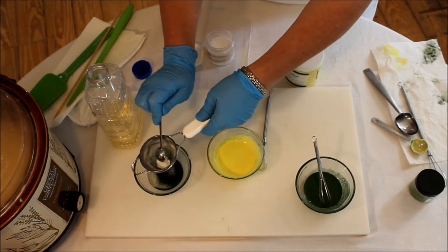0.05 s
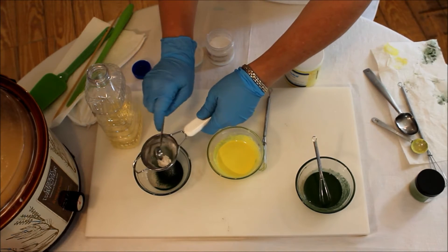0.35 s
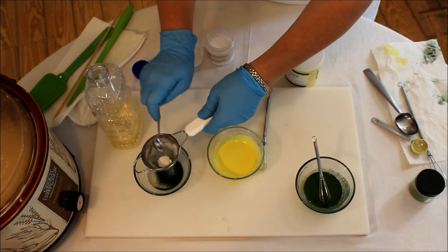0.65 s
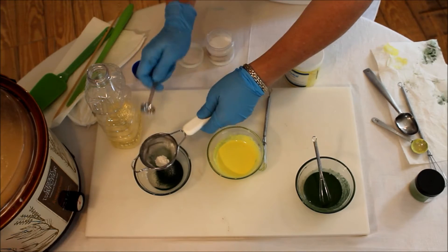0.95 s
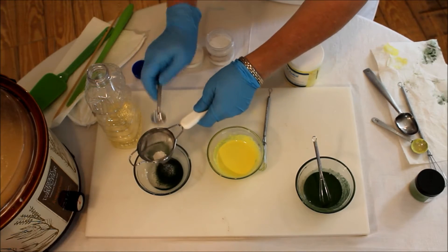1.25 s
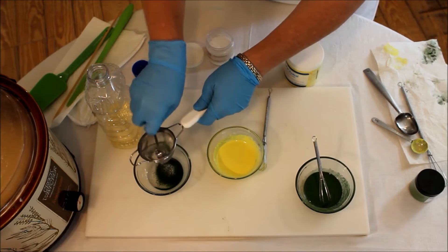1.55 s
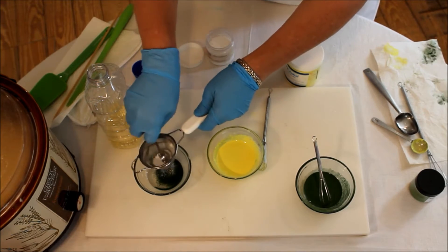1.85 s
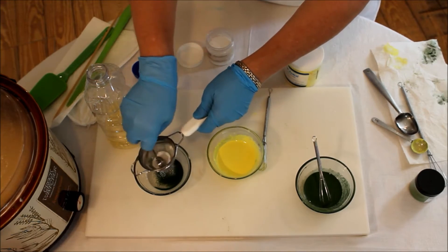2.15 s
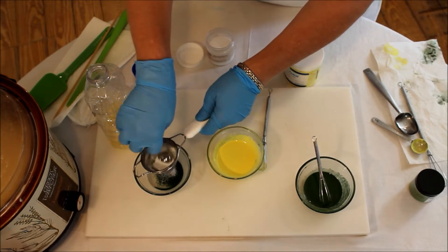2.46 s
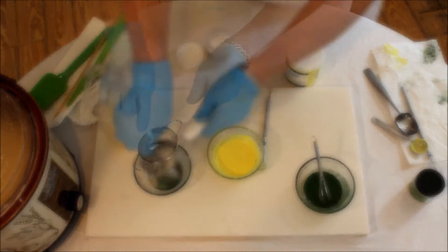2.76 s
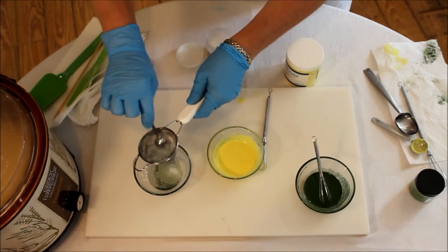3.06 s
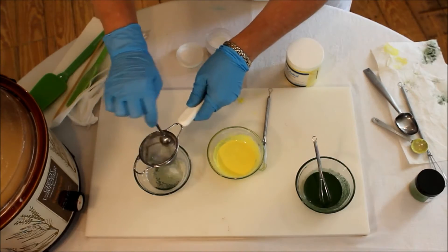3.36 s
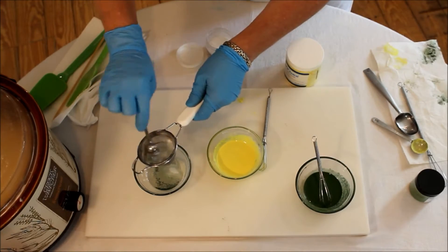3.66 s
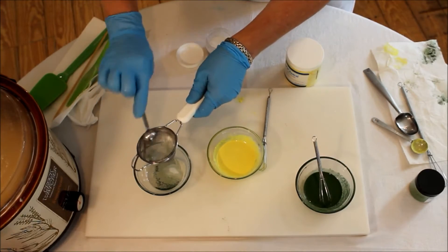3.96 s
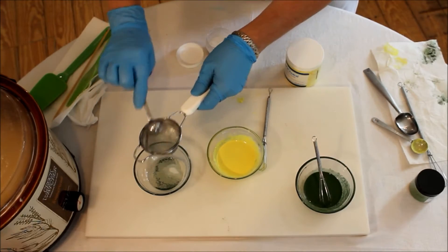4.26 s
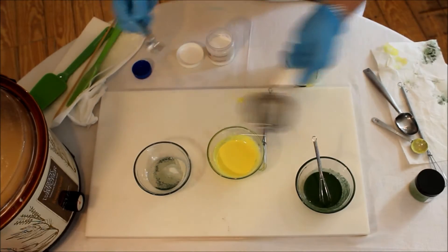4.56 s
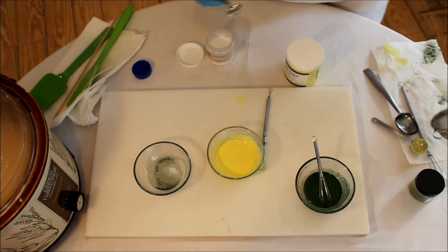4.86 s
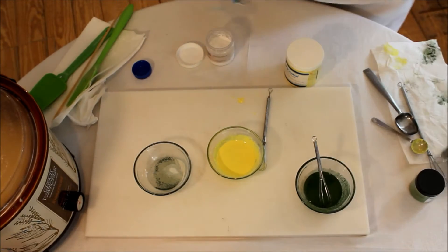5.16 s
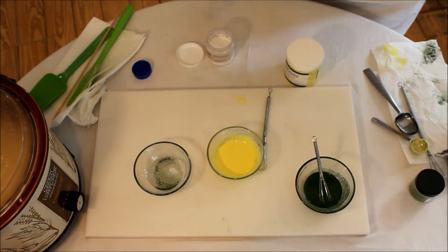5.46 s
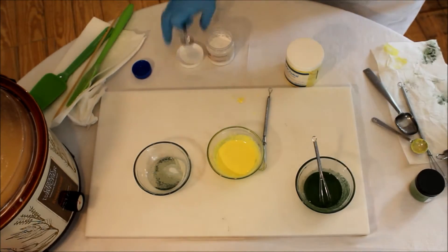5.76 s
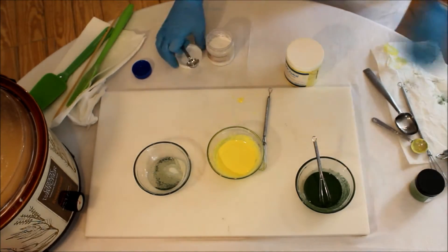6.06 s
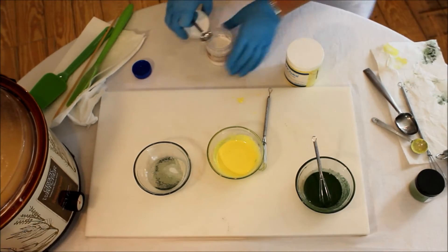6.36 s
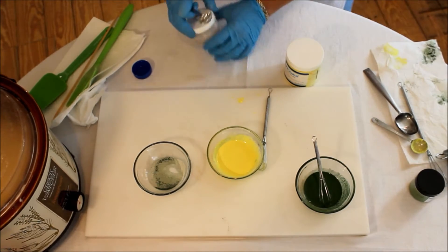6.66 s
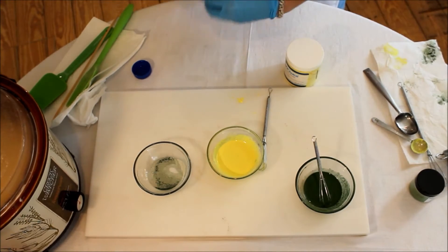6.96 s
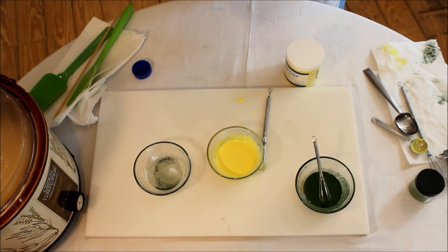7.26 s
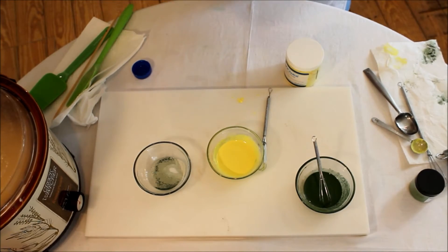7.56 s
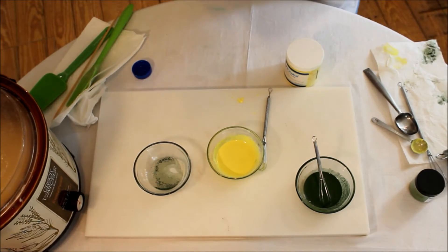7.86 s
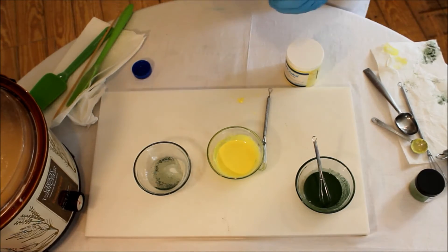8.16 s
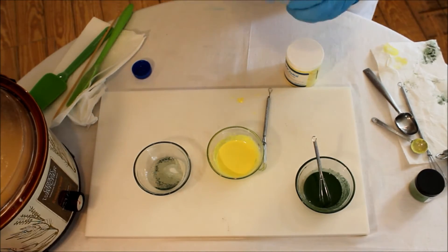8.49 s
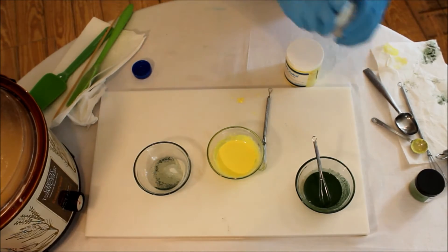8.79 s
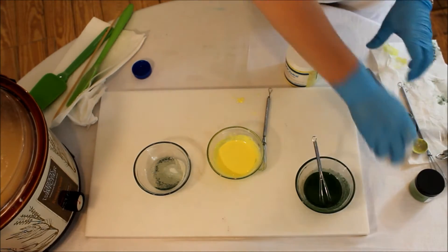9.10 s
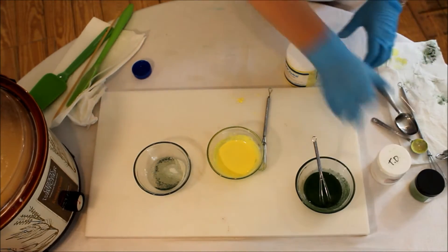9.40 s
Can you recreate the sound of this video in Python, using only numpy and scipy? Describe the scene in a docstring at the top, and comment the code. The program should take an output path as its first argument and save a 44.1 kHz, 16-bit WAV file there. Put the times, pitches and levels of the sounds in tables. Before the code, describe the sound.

Over a steady fan hum, a spoon rasps in a strainer and raps its rim, before dull thumps and small plastic knocks.

```python
"""In a small kitchen, a steel spoon works powder through a mesh strainer over a glass bowl, then raps
the rim four times. Stick-slip friction makes the mesh rasp and the spoon squeak; impacts ring their modes.
Sleeves rustle, things thud on the cloth-covered table, and a small plastic jar is handled and lidded.
An appliance fan hums throughout, and reverberation gives every knock a short tail."""
import sys
import numpy as np
from scipy import signal
from scipy.fft import rfft, irfft, next_fast_len
from scipy.io import wavfile
from scipy.ndimage import uniform_filter1d

SR = 44100
rng = np.random.default_rng(int(sys.argv[2]) if len(sys.argv) > 2 else 0)


def digitize_waveform(pressure):
    """Quantize a signal to 16-bit integers and store it at the path in sys.argv[1].

    Rows of a 2-D input are taken as channels; values are limited to [-1, 1].
    """
    field = np.atleast_2d(pressure).T
    bounded = np.clip(field, -1, 1)
    quanta = np.round(bounded * 32767).astype(np.int16)
    wavfile.write(sys.argv[1], SR, quanta)


N = 420343


def undb(db):
    """Decibels to amplitude ratio."""
    return 10 ** (np.asarray(db) / 20)


def unit(x):
    """Normalisation to rms 1."""
    return x / np.sqrt(np.mean(x ** 2))


def unit_hit(x, size=176):
    """Normalisation of an impact: its loudest four milliseconds have rms 1."""
    return x / np.sqrt(uniform_filter1d(x ** 2, size, mode="constant").max())


def add(track, s, sound):
    """Superposition: a sound joins the track at time s."""
    start = int(s * SR)
    track[start:start + len(sound)] += sound[:N - start]


def colour(x, points, resonances=()):
    """Minimum-phase filtering by (Hz, dB) points, lifted by (Hz, width, dB) resonances."""
    size = 2 * next_fast_len(len(x) // 2 + 1024)
    hz = np.maximum(np.arange(size // 2 + 1) * SR / size, 1)
    at_hz, db = np.transpose(points)
    db = np.interp(np.log(hz), np.log(at_hz), db)
    for centre, width, lift in resonances:
        db = db + lift / (1 + (2 * (hz - centre) / width) ** 2)
    cepstrum = irfft(db * np.log(10) / 20)
    cepstrum[1:size // 2] *= 2  # folding the cepstrum makes the filter causal
    cepstrum[size // 2 + 1:] = 0
    return irfft(rfft(x, size) * np.exp(rfft(cepstrum)))[:len(x)]


def resonate(x, hz, width):
    """Second-order resonance with gain 1 at its centre."""
    return signal.lfilter(*signal.iirpeak(hz, hz / width, fs=SR), x)


def walk(rate):
    """Smooth random modulation with rms 1."""
    hold = int(SR / rate)
    steps = np.repeat(rng.standard_normal(N // hold + 1), hold)
    return unit(uniform_filter1d(steps, hold)[:N])


def fade(t60):
    """Exponential decay, half a second long."""
    return np.exp(-np.log(1000) * np.arange(SR // 2) / SR / t60)


def swells(events):
    """Hann envelopes for (start, length, dB) strokes."""
    gain = np.zeros(N)
    for s, length, db in events:
        add(gain, s, undb(db) * np.hanning(int(length * SR)))
    return gain


def slides(events, attack_s, t60):
    """Attack, hold and exponential release envelopes for (start, hold, dB) slides."""
    gain = np.zeros(N)
    attack = np.linspace(0, 1, int(attack_s * SR))
    for s, hold, db in events:
        add(gain, s, undb(db) * np.concatenate([attack, np.ones(int(hold * SR)), fade(t60)]))
    return gain


def favour(modes, centre_hz, width_hz, lift_db):
    """Selective excitation: the place of contact lifts the modes near one frequency."""
    return [(hz, db + lift_db / (1 + (2 * (hz - centre_hz) / width_hz) ** 2), t60)
            for hz, db, t60 in modes]


def ring(modes, scatter_db, detune=0):
    """Free vibration of damped modes: the contact point reweights them, the grip shifts their pitch."""
    t = np.arange(SR // 2) / SR
    out = 0
    for hz, db, t60 in modes:
        side, weight, grip = rng.standard_normal(3)
        amplitude = np.sign(side) * undb(db + scatter_db * weight)
        out = out + amplitude * fade(t60) * np.sin(2 * np.pi * hz * (1 + detune * grip) * t)
    return unit_hit(out)


def crack(points, t60, rise_s=0.00054):
    """Impact transient: dense vibration builds up during contact and is quickly damped."""
    push = np.minimum(np.arange(SR // 2) / SR / rise_s, 1)
    return unit_hit(colour(rng.standard_normal(SR // 2) * push * fade(t60), points))


def slips(rate, spread_db):
    """Stick-slip friction as a Poisson train of tiny impulses of uneven size."""
    sizes = undb(spread_db * np.minimum(rng.exponential(size=N), 4))
    slipping = rng.random(N) < rate / SR
    return unit(slipping * sizes * rng.standard_normal(N))


# spectrum of the airflow: (frequency [Hz], gain [dB])
AIR_SPECTRUM = [(25, -36), (60, -22), (95, -18), (125, -0.5), (200, -8.5), (250, -2.5), (420, 3.5),
                (620, -2.5), (1200, -6.5), (2000, -13.5), (4000, -22.5), (7000, -31), (11000, -36),
                (16000, -36.5)]
# resonances of the fan housing: (frequency [Hz], bandwidth [Hz], lift [dB])
HOUSING_RESONANCES = [(173.4, 6.1, 18.2), (233, 43, 7.3), (279, 39, 11.9), (493.8, 19.4, 9.3),
                      (813, 16, 4.8)]
# motor and blade tones: (frequency [Hz], rms level [dB])
FAN_TONES = [(119.8, -63.5), (159.9, -58)]


def fan(air_db=-45.5):
    """Turbulent flow excites a resonant housing over two low tones that waver slightly in phase."""
    t = np.arange(N) / SR
    air = unit(colour(rng.standard_normal(N), AIR_SPECTRUM, HOUSING_RESONANCES))
    air *= undb(air_db + 0.33 * walk(1.43))
    hum = sum(np.sqrt(2) * undb(db) * np.sin(2 * np.pi * hz * t + 0.27 * walk(1.59))
              for hz, db in FAN_TONES)
    return air + hum


# spectra of the snapping mesh and the spoon's tick: (frequency [Hz], gain [dB])
MESH_SPECTRUM = [(50, -39), (200, -10), (700, 10.5), (1400, 7), (2150, 8), (2900, 7), (3400, 5), (5000, -4),
                 (6500, -14), (9000, -30), (16000, -45)]
TICK_SPECTRUM = [(200, -36), (1200, -7), (3000, 10), (4300, 5), (5300, 5), (6800, 5), (10000, -0.5),
                 (13500, -15), (16000, -5)]
# modes of the spoon: (frequency [Hz], relative level [dB], T60 [s])
SPOON_MODES = [(2960, 4, .026), (3240, 3, .016), (3800, -2, .025), (5280, 1, .025), (6780, 2, 0.035),
               (6980, 0, .025), (7910, 4, 0.07), (8040, -1, .05), (12600, -2, 0.03), (13400, -1, .03),
               (14100, -2, 0.03)]
# the spoon catches in the mesh and skids on:
# (time [s], mesh level [dB], mesh resonance [Hz], relative spoon level [dB], relative skid level [dB])
CATCHES = [(0.0635, -48, 2100, -35, -74), (0.188, -46, 1890, -34.5, -65), (2.833, -35, 2950, -45, -62),
           (2.858, -53, 2300, -56, -57), (2.979, -45, 2300, -58, -41.5), (3.037, -29, 2190, -53, -38.5),
           (3.2144, -29.5, 2400, -55, -38.5), (3.3068, -40.5, 1490, -71, -37), (3.32, -39, 1700, -71, -55),
           (3.373, -47, 1600, -58, -64), (3.402, -30.5, 2470, -58, -45), (3.437, -36, 1500, -51, -44),
           (3.7917, -44, 1870, -64, -50)]


def catches():
    """Sudden release: the spoon snaps off the wires, exciting a local mesh resonance and its own modes."""
    out = np.zeros(N)
    for s, mesh_db, mesh_hz, spoon_db, _ in CATCHES:
        snap = undb(-1) * crack(MESH_SPECTRUM, t60=0.014, rise_s=0.00035)
        buzz = undb(-11) * crack(MESH_SPECTRUM, t60=0.048)
        release = snap + buzz
        mesh = unit_hit(release + undb(3) * resonate(release, mesh_hz, width=950))
        tick = undb(-4) * crack(TICK_SPECTRUM, t60=0.054)
        rattle = undb(-15) * crack(TICK_SPECTRUM, t60=0.26)
        ping = undb(-4) * ring(SPOON_MODES, scatter_db=0.52)
        add(out, s, undb(mesh_db) * mesh + undb(spoon_db) * (ping + tick + rattle))
    return out


# spectrum of the coarse rasp: (frequency [Hz], gain [dB])
SKID_SPECTRUM = [(400, -5), (900, 23), (1500, 22), (2200, 14.5), (2900, 6), (3800, 7), (6000, -26),
                 (16000, -27)]


def skids(wire_slips, gain_db=-4):
    """Stick-slip friction: after each catch the spoon skips on, and the rasp dies as the wires relax."""
    envelope = slides([(s, 0, db) for s, *_, db in CATCHES], attack_s=0.0096, t60=0.34)
    return undb(gain_db) * envelope * unit(colour(wire_slips, SKID_SPECTRUM))


# spectrum of the rumble: (frequency [Hz], gain [dB])
DRAG_SPECTRUM = [(30, -24), (70, -19), (130, -7), (260, -5), (500, 0), (720, -19), (1200, -11.5),
                 (2500, -18), (6000, -36)]
# the pressed strainer drags on the bowl: (time [s], duration [s], level [dB])
DRAGS = [(0.19, 0.068, -49), (2.78, 0.33, -44.5), (3.2, 0.27, -52)]


def drags():
    """Structure-borne sound: friction of strainer on bowl makes the board beneath rumble."""
    return swells(DRAGS) * unit(colour(slips(rate=1000, spread_db=3.9), DRAG_SPECTRUM))


# spectra of the fine rasp and the crushed powder: (frequency [Hz], gain [dB])
RASP_SPECTRUM = [(1500, -5), (3500, -2.5), (6500, -9), (8800, -21), (10000, -25), (13000, -24),
                 (16000, -26)]
GRIT_SPECTRUM = [(1500, -12), (3500, -4), (5000, -2), (6800, -3.5), (9000, -11), (16000, -25)]
# resonances of the spoon's tip: (frequency [Hz], bandwidth [Hz], lift [dB])
TIP_RESONANCES = [(8500, 900, 6), (13000, 1500, 2)]
# lower and upper spoon tones sustained by friction: (frequency [Hz], bandwidth [Hz])
SQUEAK_MODES = [(7960, 260), (11170, 480)]
# strokes over the mesh, in relative levels:
# (time [s], duration [s], rasp [dB], lower squeak [dB], upper squeak [dB])
STROKES = [(0.542, 0.084, -61, -80, -90), (2.256, 0.036, -55, -62, -78), (2.495, 0.044, -51.5, -59, -79),
           (2.597, 0.27, -56.5, -82, -90), (2.84, 0.15, -56.5, -76, -85), (2.929, 0.043, -46, -47, -65),
           (3.036, 0.19, -57, -61, -59), (3.33, 0.12, -57, -54.5, -58), (3.362, 0.24, -54.5, -78, -85),
           (3.537, 0.17, -54.5, -51, -63), (3.676, 0.13, -56.5, -69, -74)]


def strokes(wire_slips, rasp_db=-1, squeak_db=-4, grit_db=-4):
    """Frictional excitation: the wires rasp and drive the spoon's high modes while grains are crushed."""
    squeak = 0
    for k, (hz, width) in enumerate(SQUEAK_MODES):
        singing = swells([(s, length, tone_db[k]) for s, length, _, *tone_db in STROKES])
        grip = undb(2.5 * walk(110))
        tone = resonate(resonate(wire_slips, hz, width), hz, width)
        squeak = squeak + singing * unit(grip * tone)
    envelope = swells([(s, length, db) for s, length, db, *_ in STROKES])
    rasp = undb(rasp_db) * unit(colour(wire_slips, RASP_SPECTRUM, TIP_RESONANCES))
    grit = undb(grit_db) * unit(colour(slips(rate=500, spread_db=2.2), GRIT_SPECTRUM))
    return envelope * (rasp + grit) + undb(squeak_db) * squeak


# spectrum of rustling cloth: (frequency [Hz], gain [dB])
CLOTH_SPECTRUM = [(800, -15), (2500, 5.5), (5000, 0.5), (7500, -7), (10000, -13.5), (16000, -21)]
# arms reach out and come back: (time [s], duration [s], level [dB])
REACHES = [(1.1, 0.33, -70), (4.5, 1.15, -61), (8.6, 1, -62.5)]


def sleeves():
    """Friction between fibres: clothing rustles unevenly as an arm reaches across the table."""
    fibres = slips(rate=3000, spread_db=1.5) * undb(2 * walk(14))
    return swells(REACHES) * unit(colour(fibres, CLOTH_SPECTRUM))


# modes of the table top: (frequency [Hz], relative level [dB], T60 [s])
TABLE_MODES = [(245, -6, .08), (305, -7, .045), (350, -9, .05), (400, -6, .06), (437, -1, .08),
               (484, 0, .09), (545, -6, .07), (663, -9, .06), (755, -6, .045), (797, -6, .055),
               (930, -9, .055), (1130, -14, .07), (1250, -20, .06)]
# spectra of a dull thud, a base meeting the cloth and the whole table giving: (frequency [Hz], gain [dB])
THUD_SPECTRUM = [(40, -59), (130, -28), (260, -6.5), (480, -6), (800, -9.5), (1300, -14.5), (1900, -42.5),
                 (5000, -49)]
BASE_SPECTRUM = [(300, -18), (900, -15), (1700, 10), (2600, -0.5), (8000, -19.5)]
BOOM_SPECTRUM = [(25, -32), (65, -5), (110, -16), (200, 4), (330, -11), (450, -10), (2000, -71)]
# things bumped or set down:
# (time [s], relative level [dB], contact cutoff [Hz], favoured frequency [Hz], boom level [dB])
THUMPS = [(2.856, -34, 1500, 546, -60), (5.513, -15, 1350, 457, -47), (5.525, -16.5, 1310, 780, -47),
          (5.535, -22, 647, 245, -39), (5.548, -27.5, 620, 484, -45), (5.579, -26, 800, 464, -48),
          (9.2785, -17, 564, 333, -36), (9.292, -24.5, 720, 480, -38), (9.320, -26.5, 560, 437, -52),
          (9.340, -32, 570, 483, -54)]


def table_thumps():
    """Cushioned impact: the cloth low-passes each blow, leaving low modes, a faint tick and a boom."""
    top, boom = np.zeros(N), np.zeros(N)
    for s, db, cutoff_hz, ring_hz, boom_db in THUMPS:
        modes = ring(favour(TABLE_MODES, ring_hz, width_hz=92, lift_db=16.4), scatter_db=1)
        thud = undb(-3) * crack(THUD_SPECTRUM, t60=0.14, rise_s=0.00078)
        cushioned = unit_hit(signal.lfilter(*signal.butter(3, cutoff_hz, fs=SR), modes + thud))
        tick = undb(-33) * crack(BASE_SPECTRUM, t60=0.21)
        add(top, s, undb(db) * (cushioned + tick))
        add(boom, s, undb(boom_db) * crack(BOOM_SPECTRUM, t60=0.19, rise_s=0.002))
    # a small table top radiates little deep bass
    return signal.lfilter(*signal.butter(2, 170, "high", fs=SR), top) + boom


# modes of the strainer: (frequency [Hz], relative level [dB], T60 [s])
STRAINER_MODES = [(2080, -5, .06), (2150, -4, .08), (3130, -2, .06), (3465, 2.5, .075), (3505, -5, .1),
                  (4112, -11, .12), (4658, -8, .17), (5163, -8, .22), (5425, -5, .22), (5502, -5, .26),
                  (5614, -7, .18), (5835, -7, .16), (6056, -4, .22), (6280, -4, .16), (6720, -3, .15),
                  (6800, -8, .22), (7350, -12, .12), (8085, -9, .13), (8480, -7, .14), (9520, -9, .12),
                  (11240, -3, .14), (11400, -5, .12), (11760, -8, .1), (13460, -4, .09)]
# spectrum of contact on the rim: (frequency [Hz], gain [dB])
RIM_SPECTRUM = [(50, -36), (300, -11), (1000, -8), (1750, -10.5), (2100, -2.5), (2550, -3.5), (3300, 3),
                (4100, 1), (6200, 7), (9000, -1.5), (13500, -1.5), (16000, -15)]
# contacts making up the four raps:
# (time [s], relative ring level [dB], relative crack level [dB], favoured frequency [Hz])
RAPS = [(3.9255, -26, -25, 7000), (4.0567, -29, -25, 5700), (4.0655, -36, -31, 11300),
        (4.1983, -29.5, -27, 6550), (4.2931, -28, -26.5, 5600), (4.2955, -37, -25, 5900),
        (4.3105, -34, -28.5, 5650)]


def rim_raps():
    """Hard impact excites a wide band: steel cracks on steel, the hand-damped rim rings, wires jangle."""
    out = np.zeros(N)
    for s, ring_db, crack_db, bright_hz in RAPS:
        modes = favour(STRAINER_MODES, bright_hz, width_hz=1000, lift_db=5)
        rim = undb(-6) * ring(modes, scatter_db=2, detune=0.002)
        contact = undb(3) * crack(RIM_SPECTRUM, t60=0.014, rise_s=0.0001)
        jangle = undb(-11) * crack(RIM_SPECTRUM, t60=0.22)
        add(out, s, undb(ring_db) * (rim + jangle) + undb(crack_db) * contact)
    return out


# modes of the hollow jar: (frequency [Hz], relative level [dB], T60 [s])
JAR_MODES = [(975, -4, .022), (1140, -2, .026), (1185, -2, .032), (1262, -2, .028), (1335, -2, .024),
             (1390, -5, .02), (1462, -2, .03), (1520, -9, .018), (2330, -20, .018)]
# spectrum of a hard plastic click: (frequency [Hz], gain [dB])
CLICK_SPECTRUM = [(50, -47), (400, -39), (1400, 8), (2400, 13.5), (5000, 8.5), (6900, 8.5), (9500, -4.5),
                  (13000, -15), (16000, -13)]
# jar, lid and spoon knock together, in relative levels: (time [s], ring [dB], favoured frequency [Hz],
# thud [dB], thud resonance [Hz], click [dB], click high-pass cutoff [Hz], room send [dB])
JAR_KNOCKS = [(6.516, -30.5, 1300, -39.5, 724, -46.5, 1200, 1),
              (6.6534, -27, 1470, -54, 890, -28, 4560, -4), (6.667, -32.5, 1240, -57, 890, -55, 4600, 3.5),
              (6.695, -39, 1420, -55, 890, -52, 4600, -10),
              (6.7439, -21.5, 1410, -23, 760, -32, 1300, -1.5),
              (6.7749, -23, 1400, -33, 780, -42, 1300, -6), (6.9263, -40, 1270, -39, 507, -54, 1180, 4.5),
              (6.9756, -28, 1250, -53, 450, -45, 2000, -4), (7.145, -62, 1300, -60, 506, -43, 3570, -8),
              (7.2657, -31, 1160, -24.5, 487, -35, 1200, -3.5),
              (7.275, -23, 1150, -37, 460, -32, 2000, -2.5), (7.3001, -33, 1160, -47, 431, -40.5, 2000, -5),
              (7.6762, -38, 1130, -35.5, 570, -51, 1200, -2),
              (7.6821, -40, 1200, -46, 583, -44.5, 1400, -1), (7.692, -47, 1000, -41, 486, -52, 1200, -2),
              (8.0636, -35.5, 1430, -47, 517, -37, 1800, -4), (8.1018, -40, 1400, -46, 517, -44.5, 1800, 4),
              (8.1436, -38.5, 1310, -39, 507, -46.5, 1200, 2.5),
              (8.1807, -40.5, 1090, -44, 517, -52, 1200, 0),
              (8.359, -46, 1310, -62, 490, -47.5, 3470, -0.5), (8.421, -54, 1300, -43, 495, -50, 3000, 0)]


def jar_knocks():
    """Heavily damped modes: plastic clacks over a thud. Gives direct sound and spill into the room."""
    direct, spill = np.zeros(N), np.zeros(N)
    for s, ring_db, ring_hz, thud_db, thud_hz, click_db, cutoff_hz, room_db in JAR_KNOCKS:
        blow = crack(THUD_SPECTRUM, t60=0.07)
        thud = undb(-3) * unit_hit(resonate(blow, thud_hz, width=140) + undb(-12.5) * blow)
        modes = favour(JAR_MODES, ring_hz, width_hz=160, lift_db=5)
        hollow = undb(-2) * ring(modes, scatter_db=2, detune=0.025)
        snap = crack(CLICK_SPECTRUM, t60=0.014, rise_s=0.0002)
        rattle = undb(-9) * crack(CLICK_SPECTRUM, t60=0.13)
        click = unit_hit(signal.lfilter(*signal.butter(2, cutoff_hz, "high", fs=SR), snap + rattle))
        knock = undb(ring_db) * hollow + undb(thud_db) * thud + undb(click_db) * click
        add(direct, s, knock)
        add(spill, s, undb(room_db) * knock)  # what the hands let out
    # so small a jar radiates no bass
    return signal.lfilter(*signal.butter(2, 220, "high", fs=SR), [direct, spill])


# spectrum of the rubbing: (frequency [Hz], gain [dB])
RUB_SPECTRUM = [(410, -15), (700, -14), (820, 4), (1250, -2), (1710, 1), (2500, 2), (4260, -3.5),
                (7000, -9), (16000, -20)]
# resonance of the hollow lid: (frequency [Hz], bandwidth [Hz], lift [dB])
LID_RESONANCE = [(1300, 600, 4)]
# gloves and lid slide: (time [s], hold [s], relative level [dB])
RUBS = [(6.672, 0.06, -64), (7.685, 0.0085, -49), (7.82, 0.11, -64), (8.075, 0.082, -57),
        (8.36, 0.062, -59)]


def lid_rubs(gain_db=1):
    """Stick-slip friction: gloves and lid slide in small jerks, coloured by the lid's resonance."""
    jerks = undb(3 * walk(50))
    friction = slips(rate=1100, spread_db=2.2) * jerks
    envelope = slides(RUBS, attack_s=0.0035, t60=0.21)
    return undb(gain_db) * envelope * unit(colour(friction, RUB_SPECTRUM, LID_RESONANCE))


def kitchen(x, wet_db, low_t60=0.39, high_t60=0.28, build_s=0.0042, split_hz=6000):
    """Diffuse reverberation: a short tail whose treble decays first."""
    lows = signal.lfilter(*signal.butter(2, split_hz, fs=SR), rng.standard_normal(SR // 2))
    highs = signal.lfilter(*signal.butter(2, split_hz, "high", fs=SR), rng.standard_normal(SR // 2))
    swell = np.minimum(np.arange(SR // 2) / SR / build_s, 1) ** 2
    tail = swell * (lows * fade(low_t60) + undb(-2.5) * highs * fade(high_t60))
    return undb(wet_db) * signal.fftconvolve(x, tail / np.sqrt(np.sum(tail ** 2)))[:N]


def scene():
    """Direct and reverberant sound add; the jar, further off than the strainer, is more reverberant."""
    strainer = rim_raps() + catches()
    wire_slips = slips(rate=1500, spread_db=2.2) * undb(2.5 * walk(90))
    strainer += skids(wire_slips) + strokes(wire_slips) + drags()
    table = table_thumps()
    handling = lid_rubs() + sleeves()
    knocks, spill = jar_knocks()
    room = kitchen(strainer, wet_db=-7)
    room += kitchen(spill + handling, wet_db=-2.5, low_t60=0.42)
    room += kitchen(table, wet_db=-9.5, low_t60=0.43)
    return (strainer + knocks + handling + table + room + fan())[None]


def record(dry):
    """Band limiting: a steep low-pass at 15550 Hz cuts the top of the treble."""
    return signal.sosfilt(signal.ellip(10, 0.2, 80, 15550, fs=SR, output="sos"), dry)


dry = scene()
out = record(dry)
digitize_waveform(out)
```